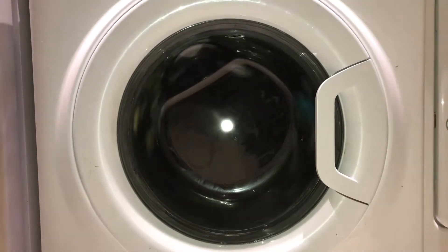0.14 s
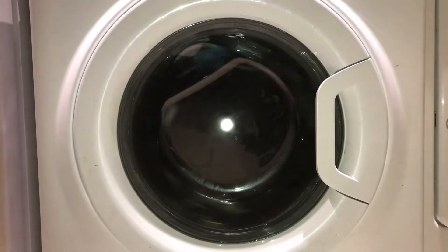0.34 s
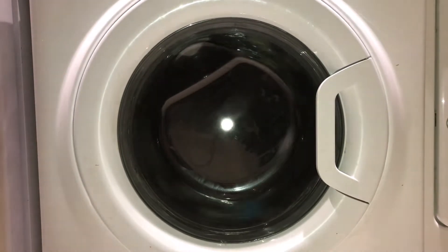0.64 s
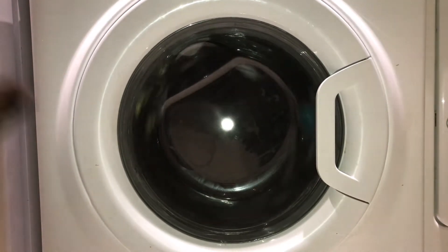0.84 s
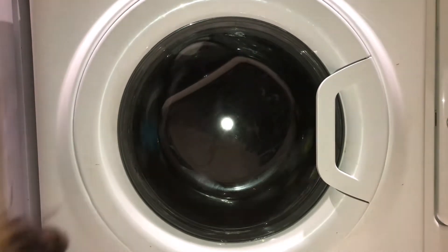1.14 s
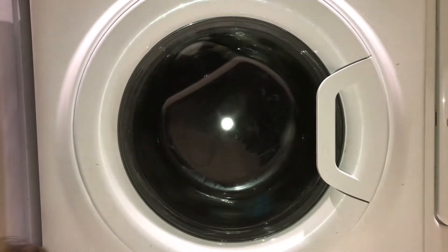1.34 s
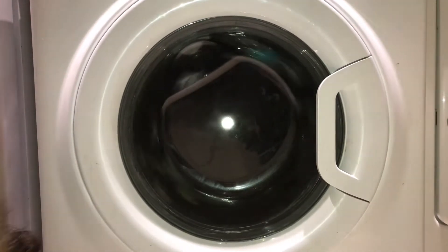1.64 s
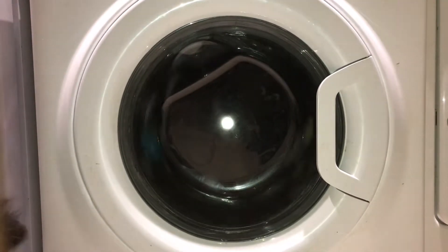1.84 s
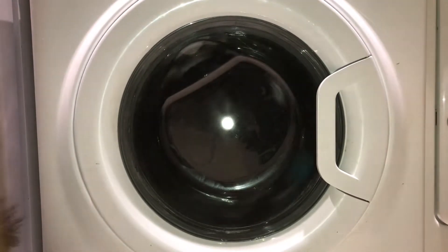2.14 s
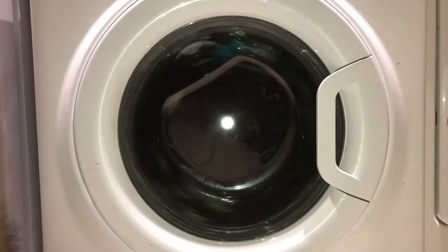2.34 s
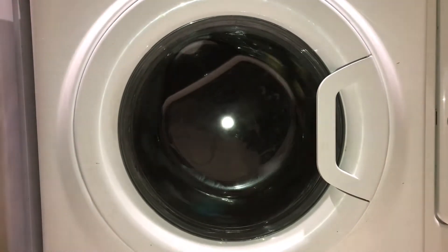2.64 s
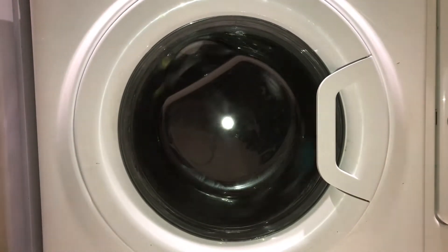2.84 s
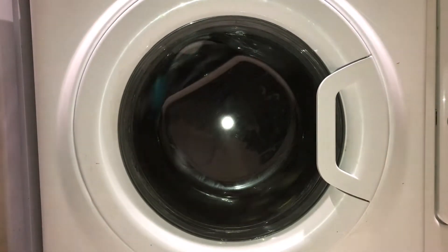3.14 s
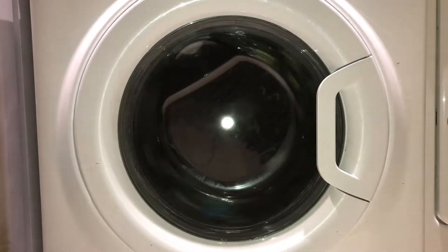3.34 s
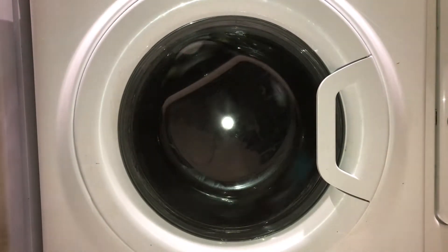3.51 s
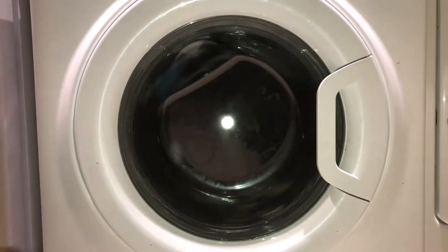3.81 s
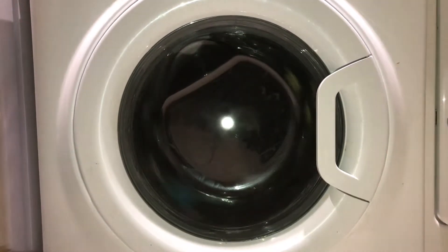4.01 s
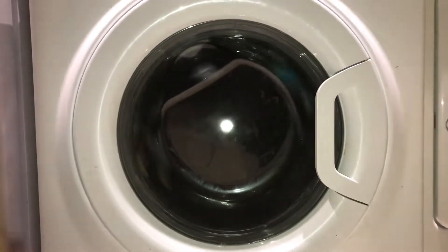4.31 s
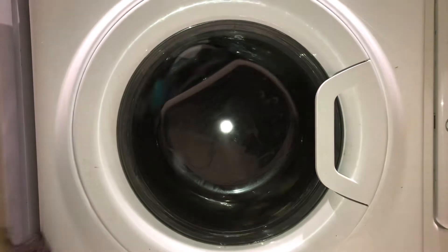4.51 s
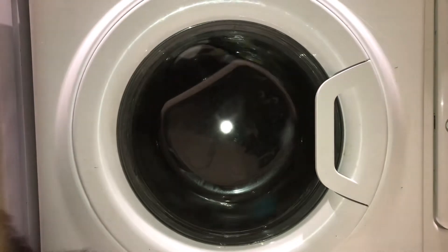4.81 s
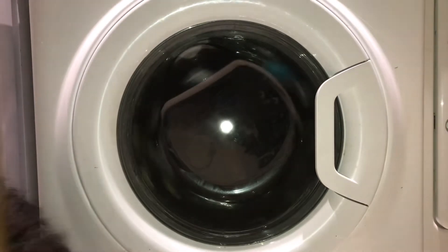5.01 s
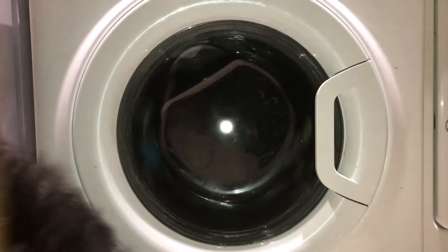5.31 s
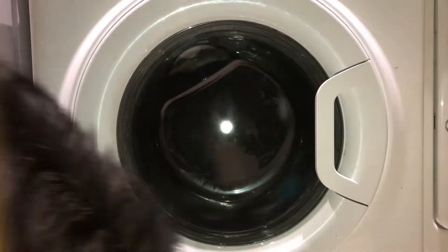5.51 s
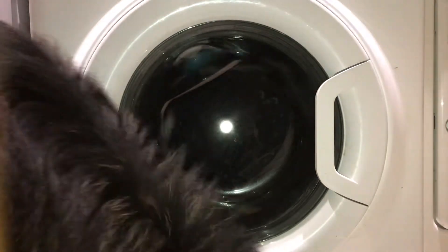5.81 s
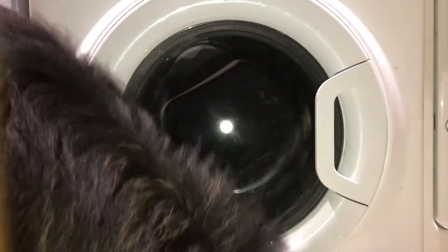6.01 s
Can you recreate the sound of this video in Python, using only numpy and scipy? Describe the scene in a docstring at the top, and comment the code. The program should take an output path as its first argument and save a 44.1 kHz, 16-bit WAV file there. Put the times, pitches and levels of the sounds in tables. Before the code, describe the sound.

A front-loading washing machine turns a wet load in a small room, with a quiet swish, a faint motor hum, a few water gulps and small ticks. After about two seconds, hard clunks and lighter knocks rattle its body in uneven clusters. A pet pushes past close to the microphone, and its fur rubs in strokes that grow louder, mixed with sharp taps and soft thuds on the housing.

```python
"""Washing machine and passing pet

A front-loading machine turns its wet load in a small room: filtered noise swishes and gulps, and sines hum and
whistle. Brief noise bursts tick here and there. Hard things clunk and rattle in uneven clusters: noise bursts
excite a body and a loose panel, and the room answers. A furry pet pushes past close to the microphone:
irregular noise makes the rub of fur, short bursts make sharp taps, and slow sine swings with low noise make
soft thuds."""
import sys
import numpy as np
from scipy import signal
from scipy.fft import rfft, irfft, next_fast_len
from scipy.io import wavfile
from scipy.ndimage import uniform_filter1d, map_coordinates

SR = 44100
rng = np.random.default_rng(int(sys.argv[2]) if len(sys.argv) > 2 else 0)


def master_out(mix):
    """Clip the mix to full scale and print it as 16-bit PCM to the path in sys.argv[1]."""
    frames = np.transpose(np.atleast_2d(mix))
    ceiling = np.clip(frames, -1, 1)
    pcm = np.round(ceiling * 32767).astype(np.int16)
    wavfile.write(sys.argv[1], SR, pcm)


N = 271656
TIME = np.arange(N) / SR  # seconds through the scene
HIT = np.arange(SR // 2) / SR  # seconds after one event


def amp(db):
    """Logarithmic level: decibels to amplitude gain."""
    return 10 ** (np.asarray(db) / 20)


def unit(x):
    """Power normalisation: scale to rms 1."""
    return x / np.sqrt(np.mean(np.abs(x) ** 2) + 1e-20)


def along(points, hz):
    """Logarithmic pitch scale: interpolate (Hz, value) points over log frequency."""
    f, v = np.transpose(points)
    return np.interp(np.log(hz + 1), np.log(f + 1), v)


def wobble(rate, size=N):
    """Slow random modulation: a smooth curve through rate random knots a second."""
    knots = rng.standard_normal(int(size * rate / SR) + 4)
    return map_coordinates(knots, [TIME[:size] * rate])


def filtered(x, response):
    """Linear filtering: multiply the spectrum by a response of frequency."""
    m = next_fast_len(len(x) + SR // 4)
    spectrum = rfft(x, m) * response(np.fft.rfftfreq(m, 1 / SR))
    return irfft(spectrum, m)[:len(x)]


def resonance(f, hz, width):
    """Damped oscillator: the causal response of one mode, width in Hz."""
    return 1j * f * width / (hz * hz - f * f + 1j * f * width)


def causal(db):
    """Minimum phase: the response with this gain that sounds nothing before a blow."""
    cepstrum = irfft(np.log(amp(db)))
    half = len(cepstrum) // 2
    folded = np.r_[cepstrum[0], 2 * cepstrum[1:half], np.zeros(half)]
    return np.exp(rfft(folded))


def noise(response):
    """Spectral shaping: coloured noise of rms 1."""
    return unit(filtered(rng.standard_normal(N), response))


def sine(hz, waver):
    """Phase modulation: a tone of rms 1 whose phase wavers, in radians."""
    return np.sqrt(2) * np.sin(2 * np.pi * hz * TIME + waver)


def dying(t60):
    """Exponential decay: amplitude falls by 60 dB in t60 seconds."""
    return np.exp(-np.log(1000) * HIT / t60)


def add(track, s, sound):
    """Superposition: mix a sound in at time s."""
    part = track[max(round(s * SR), 0):][:len(sound)]
    part += sound[:len(part)]


def burst(t60):
    """Impulsive excitation: dying noise of energy 1."""
    x = rng.standard_normal(len(HIT)) * dying(t60)
    return x / np.linalg.norm(x)


# Decay of the room. Each row: frequency in Hz, time to fall by 60 dB in seconds.
ROOM_DECAY = [(100, 0.15), (300, 0.47), (1500, 0.39), (5000, 0.3), (15000, 0.23)]


def room_tail():
    """Reverberation: noise of energy 1 builds up, then each frequency dies at its own speed."""
    hz, t, z = signal.stft(rng.standard_normal(len(HIT)), SR, nperseg=256)
    t60 = along(ROOM_DECAY, hz)[:, None]
    x = signal.istft(z * np.exp(-np.log(1000) * t / t60), SR, nperseg=256)[1][:len(HIT)]
    x = x * (1 - np.exp(-HIT / 0.0019))
    return x / np.linalg.norm(x)


def strike(force, colour_db):
    """Source and filter: a force through a body, with the energy of rms 1 held for 5 ms."""
    size = 2 ** 15
    body = causal(colour_db(np.fft.rfftfreq(size, 1 / SR)))
    x = irfft(rfft(force, size) * body)[:len(HIT)]
    return x / np.linalg.norm(x) * np.sqrt(SR * .005)


# The turning drum. Each row: time in seconds, level in dB before the 2 dB cut in swish.
DRUM_LEVEL = [(0.0, -52.5), (0.63, -57), (0.83, -55.5), (1.58, -53), (1.91, -55.5), (2.1, -55.5)]
# Colour of the turning wash. Each row: frequency in Hz, relative noise density in dB.
WASH_COLOUR = [(20, -17), (40, -3), (130, -7.5), (230, -8.5), (450, -6.5), (850, -10), (1200, -15),
               (1800, -14), (4300, -16), (5200, -18.5), (6600, -20), (7600, -27.5), (13500, -28.5),
               (16000, -59)]


def swish():
    """Amplitude-modulated noise: the wet load swishes round with an uneven level."""
    seconds, level_db = np.transpose(DRUM_LEVEL)
    drum_db = np.interp(TIME, seconds, level_db)
    uneven_db = 1.43 * wobble(9) + 1.9 * wobble(45)
    return amp(drum_db - 2.0 + uneven_db) * noise(lambda f: amp(along(WASH_COLOUR, f)))


# Tub resonances stirred by the load. Each row: frequency in Hz, width of one filter pass in Hz, mean level in dB.
TUB_MODES = [(446, 19, -67.5), (589.5, 70, -65), (2678, 140, -68.5), (4004, 114, -65.5)]


def tub():
    """Resonance under random drive: the load stirs modes of the tub, each filtered twice."""
    return sum(amp(db + 2.4 * wobble(7.13)) * noise(lambda f: resonance(f, hz, width) ** 2)
               for hz, width, db in TUB_MODES)


# Motor hum. Each row: frequency in Hz, mean level in dB.
HUM_LINES = [(59, -77), (100, -84), (877, -75), (980, -99), (1152, -84)]


def motor():
    """Line spectrum: steady tones hum with slowly wavering level and phase."""
    return sum(amp(db + 3.0 * wobble(2.9)) * sine(hz, 0.63 * wobble(5.8)) for hz, db in HUM_LINES)


WHISTLE_PEAK_S, WHISTLE_DB = 0.293, -58.5  # time of the peak; level there, before each tone's offset
WHISTLE_SWELL_DB_PER_S, WHISTLE_FADE_DB_PER_S = 46, 220


def whistle():
    """Exponential envelope: two thin tones swell, then fade faster."""
    age = TIME - WHISTLE_PEAK_S
    level_db = WHISTLE_DB + np.minimum(WHISTLE_SWELL_DB_PER_S * age, -WHISTLE_FADE_DB_PER_S * age)
    return sum(amp(level_db + db + 4.5 * wobble(27.5)) * sine(hz, 0.7 * wobble(50))
               for hz, db in [(3090, -1.5), (3570, -11)])


# Soft bumps without a knock. Each row: start in seconds, level in dB before the 2 dB lift in thuds, pitch in Hz.
SOFT_BUMPS = [(.005, -48, 123), (.035, -44, 50), (4.06, -44.5, 81), (4.14, -48, 69.5), (4.97, -53, 43),
              (5.509, -41.5, 77), (5.866, -44.5, 79.5), (6.05, -51, 45)]
THUD_HZ = 92.3  # the low push behind clunks and knocks


def thuds():
    """Low-frequency transient: soft pushes, alone or behind a knock, swing with a dull rustle of low noise."""
    out = np.zeros(N)
    u = HIT / 0.02
    swell = u ** 2 * np.exp(2 * (1 - u))  # peaks at 1 after 20 ms
    behind = [(s, thud_db, THUD_HZ) for s, *_, thud_db in list(HEAVY_CLUNKS) + list(LIGHT_KNOCKS)]
    for s, db, hz in list(SOFT_BUMPS) + behind:
        swing = np.sin(2 * np.pi * (hz * HIT + rng.random()))
        rustle = rng.standard_normal(len(HIT))
        dull = unit(filtered(rustle, lambda f: resonance(f, 1.36 * hz, 2.1 * hz) ** 2))
        add(out, s, amp(db + 2) * swell * (swing + 0.44 * dull))
    return out


# Clear small ticks. Each row: start in seconds, level in dB, pitch in Hz.
CLEAR_TICKS = [(.3976, -47.5, 4280), (.7478, -46, 3450), (1.2576, -47, 2950), (1.5739, -48.5, 2830),
               (1.5964, -46.5, 3900), (1.6647, -42.5, 3380), (2.2065, -42.5, 4570), (2.7612, -36, 4700),
               (3.501, -43.5, 8600), (3.528, -38.5, 3760), (3.5455, -44, 6640), (3.5644, -39, 4850),
               (4.0535, -35, 4630), (5.114, -40, 9900), (6.1041, -40, 7700)]


def ticks():
    """Damping by pitch: a few clear ticks among many faint; the higher the tick, the shorter its burst."""
    out = np.zeros(N)
    faint = [(u * N / SR, -59 + 5 * v, 2500 + 3000 * w) for u, v, w in rng.random(size=(45, 3))]
    for s, db, hz in list(CLEAR_TICKS) + faint:
        force = burst(70 / hz) + amp(-8.5) * room_tail()
        colour_db = lambda f: 20 * np.log10(np.abs(resonance(f, hz, 0.5 * hz)) ** 2 + 1e-3)
        add(out, s, amp(db) * strike(force, colour_db))
    return out


# Water gulping and sloshing in the tub. Each row: start in seconds, level in dB at the envelope's peak,
# pitch in Hz, width of one filter pass in Hz, rise in seconds, time to fall by 60 dB in seconds.
WATER_GULPS = [(0.465, -49.5, 303, 300, 0.013, 0.29), (.465, -46, 980, 530, .0084, .41),
               (1.102, -60, 2407, 3000, 0.023, 0.38), (1.516, -54.5, 1300, 1500, 0.011, 0.48),
               (1.662, -45, 605, 120, 0.0086, 0.17)]


def water():
    """Enveloped resonant noise: gulps in the tub swell, ring and die."""
    out = np.zeros(N)
    for s, db, hz, width, rise, t60 in WATER_GULPS:
        shape = (1 - np.exp(-(HIT / rise) ** 2)) * dying(t60)
        gulp = noise(lambda f: resonance(f, hz, width) ** 2)[:len(HIT)]
        add(out, s, amp(db) * shape / shape.max() * gulp)
    return out


# Strokes of fur over the housing. Each row: start in seconds, rise in seconds, length including the rise in
# seconds, rub level in dB, hiss gain relative to the rub in dB, leaning rumble relative to the rub in dB.
FUR_STROKES = [(2.117, 0.011, 0.23, -51, 2.5, -8.5), (2.257, 0.069, 0.063, -41.5, 2, -14),
               (2.674, 0.11, 0.048, -50.5, 11.5, -4), (3.144, .03, 0.19, -42.5, -21, -10),
               (3.447, .17, 0.26, -40.5, -0.5, -14), (3.789, 0.057, 0.25, -39, 2, -10.5),
               (4.196, 0.19, 0.27, -40, 2, -13.5), (4.479, 0.023, 0.082, -37.5, 3.5, -14.5),
               (4.568, 0.02, 0.25, -44.5, 7.5, -19), (4.698, 0.04, 0.47, -37, 1, -20.5),
               (5.163, 0.015, 0.017, -36.5, 11, -25), (5.193, 0.022, .07, -33, -2.5, -14),
               (5.262, 0.15, .42, -33.5, 2.5, -14.5), (5.75, 0.13, 0.61, -39.5, -5.5, -11.5)]
STROKE_FADE_DB_PER_S = 109  # once the push ends


def stroke_gains():
    """Power addition: each stroke rises, holds and fades; overlapping strokes of rub, hiss and rumble add."""
    power = np.zeros((3, N))
    for s, rise_s, length_s, db, hiss_db, lean_db in FUR_STROKES:
        age = np.maximum(TIME - s, 0)
        fall_db = STROKE_FADE_DB_PER_S * np.maximum(age - length_s, 0)
        push = np.minimum(age / rise_s, 1) * amp(db - fall_db)
        power += np.outer(amp([0, hiss_db, lean_db]) ** 2, push ** 2)
    return np.sqrt(power)


def patchy(x, depth_db):
    """Time-frequency modulation: random gains over patches of both, as the contact spot shifts."""
    z = signal.stft(x, nperseg=512)[2]
    field = uniform_filter1d(rng.standard_normal(z.shape), size=7, axis=0)
    field = uniform_filter1d(field, size=6, axis=1)
    return signal.istft(z * amp(depth_db * unit(field)), nperseg=512)[1][:N]


# Colour of the rubbing fur. Each row: frequency in Hz, relative gain in dB.
FUR_COLOUR = [(60, -20), (250, -10.5), (600, -8), (850, -3), (1250, 2), (1700, 0.5), (2200, -2.5),
              (3800, -3.5), (5200, -6.5), (7300, -12), (9000, -12.5), (10800, -18), (16000, -18.5)]
# Colour of leaning on the housing. Each row: frequency in Hz, relative noise density in dB.
RUMBLE_COLOUR = [(25, -34), (80, 6), (115, -12), (180, 0), (260, -12.5), (400, 1), (600, -12.5),
                 (1500, -21)]


def fur():
    """Stick-slip friction: countless hairs slip over the housing and a few snag; leaning adds a rumble."""
    rub_gain, hiss_gain, lean_gain = stroke_gains()
    slip_size = amp(3.4 * rng.standard_normal(N) + 0.92 * wobble(400))
    slips = unit(rng.standard_normal(N) * slip_size)
    snags = unit((rng.random(N) < 160 / SR) * rng.uniform(-1, 1, N))  # about 160 a second
    shell = (HIT == 0) + .3 * burst(.03)  # faint reflections inside the housing
    drive = signal.fftconvolve(slips + amp(-9.0) * snags, shell)[:N]
    rub = unit(filtered(patchy(drive, depth_db=2.0), lambda f: amp(along(FUR_COLOUR, f))))
    hiss = filtered(rub, lambda f: f ** 4 / (f ** 4 + 4500 ** 4))
    uneven_hiss = hiss_gain * amp(0.3 * wobble(40)) * hiss
    brush = amp(0.23 * wobble(30)) * (rub_gain * (rub - hiss) + uneven_hiss)
    rumble = lean_gain * amp(3.5 * wobble(25)) * noise(lambda f: amp(along(RUMBLE_COLOUR, f)))
    return brush + rumble


# Light single knocks. Each row: start in seconds, level in dB before the 0.5 dB lift in clunks, bass and treble
# in dB before the 0.9 scaling there, thud level in dB before the 2 dB lift in thuds.
LIGHT_KNOCKS = [(2.286, -37.5, 19, 8, -49), (2.3148, -34, 17, 13, -56), (2.686, -31.5, 13, -7, -52),
                (2.7241, -37, 18, -.5, -60), (3.0037, -30.5, 8, 4, -65), (3.438, -42, 6, -14, -64.5),
                (4.4584, -30, -3, 1, -62), (4.5011, -22.5, -1, -2.5, -41), (4.606, -31.5, -4, -9, -50),
                (5.249, -30, 11, -3, -47), (5.35, -30.5, 9, -1, -54), (5.722, -28, 1, -15, -62),
                (5.8359, -36, 11, -4, -57.5)]
# Heavy clunks, each a touch, a blow and a rebound. Each row: blow in seconds, level in dB, bass in dB, treble
# in dB, main ring in Hz, touch before the blow in seconds, touch in dB relative to the blow, rebound after it
# in seconds, rebound in dB relative to the blow, thud in dB; lifts and scaling as for the light knocks.
HEAVY_CLUNKS = [(2.3741, -18.5, 6.5, 12.5, 3620, 0.013, -7, 0.0044, 1, -49),
                (3.0215, -21, 6.5, 1, 4500, .0295, -9.5, 0.012, -1.5, -49),
                (3.271, -19, 6, -1.5, 3950, .0269, -7, .0159, -1.5, -37),
                (3.928, -13, -8.5, -2, 4500, .013, -12, .02, -6.5, -42)]
KNOCK_RING_HZ = 1350  # main ring of the light knocks
# Before the 0.9 scaling: the touch has more bass and less treble than the blow, the rebound less treble.
TOUCH_BASS_DB, TOUCH_TREBLE_DB, REBOUND_TREBLE_DB = 9, -10.5, -6.5


def contacts():
    """Repeated impact: one (s, dB, bass dB, treble dB, main ring Hz) for a knock, three for a clunk."""
    rows = [(s, db, bass_db, treble_db, KNOCK_RING_HZ) for s, db, bass_db, treble_db, _ in LIGHT_KNOCKS]
    for s, db, bass_db, treble_db, hz, before_s, touch_db, after_s, rebound_db, _ in HEAVY_CLUNKS:
        rows += [(s - before_s, db + touch_db, bass_db + TOUCH_BASS_DB, treble_db + TOUCH_TREBLE_DB, hz),
                 (s, db, bass_db, treble_db, hz),
                 (s + after_s, db + rebound_db, bass_db, treble_db + REBOUND_TREBLE_DB, hz)]
    return rows


# The ringing panel. Each row: frequency in Hz, relative level in dB, time to fall by 60 dB in seconds.
PANEL_MODES = [(162.8, -1, 0.34), (202, 8, 0.12), (293.3, 0, 0.29), (347, 3, 0.3), (477, 0.5, 0.26),
               (595, 10.5, 0.15), (766, 3.5, 0.28), (967, 2.5, 0.33), (1290, 10, 0.21), (1386, 9.5, 0.21),
               (2477, 4.5, 0.18), (2800, 4, 0.24), (3630, -0.5, 0.29), (4330, -11, 0.18), (5825, -7, 0.27),
               (8600, -8, .13), (9200, -9, .13)]


def panel_ring(contact):
    """Modal synthesis: the loose panel's modes, blurred by rattling and struck at new strengths each time."""
    ring = 0
    for hz, level, t60 in PANEL_MODES:
        chance_db = rng.uniform(-3, 3)
        blur = .22 * wobble(3 * np.sqrt(hz), size=len(HIT))
        cycles = hz * HIT + rng.random() + blur
        strength = amp(level + chance_db + contact(hz) / 2)
        ring = ring + strength * dying(t60) * np.sin(2 * np.pi * cycles)
    return ring * (1 - np.exp(-HIT / 0.0027))


# Colour of the clunking body. Each row: frequency in Hz, relative gain in dB.
CLUNK_COLOUR = [(30, -20), (90, -5.5), (170, 0.5), (330, 0), (800, -0.5), (1450, 4), (1950, -4),
                (2600, -4.5), (3700, -1.5), (4700, -4.5), (5600, -3.5), (7200, -14.5), (8800, -10),
                (16000, -21.5)]
SPOT_DB, SPOT_WIDTH_HZ = 7.5, 170  # how far a main ring stands out; half its width


def clunks():
    """Impact excitation: each contact cracks, chatters and rings a loose panel; the room answers with more bass."""
    out = np.zeros(N)
    for s, db, bass_db, treble_db, hz in contacts():
        contact = lambda f: 0.9 * along([(200, bass_db), (1100, 0), (6000, treble_db)], f)
        spot = lambda f: SPOT_DB / (1 + ((f - hz) / SPOT_WIDTH_HZ) ** 2)
        body = lambda f: along(CLUNK_COLOUR, f) + contact(f) + spot(f)
        tilt = lambda f: along([(150, -2.5), (700, -1.0), (4000, 1), (9000, 0.5)], f)
        chatter = burst(.06) * np.exp(.6 * wobble(600, size=len(HIT)))
        crack = burst(.011)
        force = crack + amp(-1) * chatter / np.linalg.norm(chatter)
        direct = strike(force, lambda f: body(f) + tilt(f))
        answer = amp(-4) * strike(room_tail(), body)
        add(out, s, amp(db + 0.5) * (direct + answer + amp(-21.5) * panel_ring(contact)))
    return out


# Taps on the housing. Each row: start in seconds, level in dB before the 2.05 dB lift in taps, bass and treble
# in dB before the 0.91 scaling there, main ring in Hz.
HOUSING_TAPS = [(3.173, -24.5, 17, -16, 1000), (3.5857, -19.5, 11, -6, 1440), (3.796, -19, 4, 16.5, 2340),
                (4.3488, -21.5, 11.5, -2.5, 1350), (4.7620, -28, -2, 34, 6540),
                (4.8752, -15, 6.5, 0.5, 2710), (4.9351, -16.5, -1, 1, 1320), (5.179, -28.5, -20, -14, 1800),
                (5.4133, -20, 15, 36, 3370), (5.8662, -32.5, 19, 9, 1960), (5.906, -12, 11, -4.5, 1590),
                (5.984, -22.5, 5, -12, 2640)]
# Colour of the housing. Each row: frequency in Hz, relative gain in dB.
HOUSING_COLOUR = [(60, -30), (250, -28), (450, -17), (680, -4), (960, -4.5), (1380, 2.5), (1900, -3),
                  (2700, -3), (4300, -9.5), (6000, -20), (10000, -24), (16000, -36)]


def taps():
    """Local resonance: a short, rough push rings each spot at its own pitch; scatter and a little room follow."""
    out = np.zeros(N)
    for s, db, bass_db, treble_db, hz in HOUSING_TAPS:
        push = burst(0.022)
        scatter = amp(-1.0) * burst(0.12)
        force = push + scatter + amp(-8.5) * room_tail()
        contact = lambda f: 0.91 * along([(550, bass_db), (1400, 0), (5000, treble_db)], f)
        spot = lambda f: 7 / (1 + ((f - hz) / 130) ** 2)
        add(out, s, amp(db + 2.05) * strike(force, lambda f: along(HOUSING_COLOUR, f) + contact(f) + spot(f)))
    return out


def scene():
    """Superposition of sources: everything reaches one microphone, copied to two channels."""
    machine = swish() + tub() + motor() + whistle()
    pet = taps() + fur()
    return np.tile(machine + thuds() + ticks() + water() + clunks() + pet, (2, 1))


def record(dry):
    """Band limitation: the microphone thins out the deep bass and cuts steeply above its band limit."""
    band = lambda f: 1 / (1 + (f / 15950) ** 120)  # limit in Hz
    low_cut = lambda f: (1j * f / (22 + 1j * f)) ** 2  # corner in Hz
    return np.array([filtered(x, lambda f: band(f) * low_cut(f)) for x in dry])


dry = scene()
out = record(dry)
master_out(out)
```